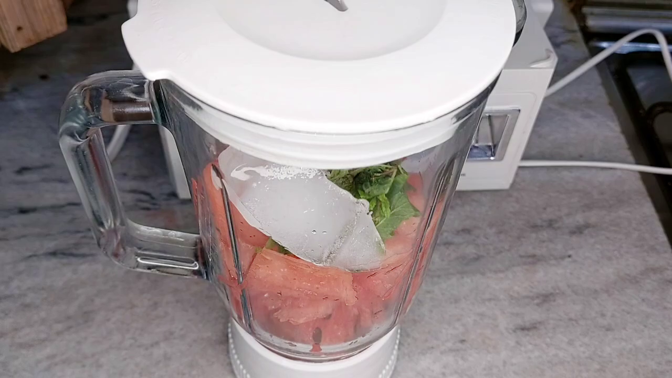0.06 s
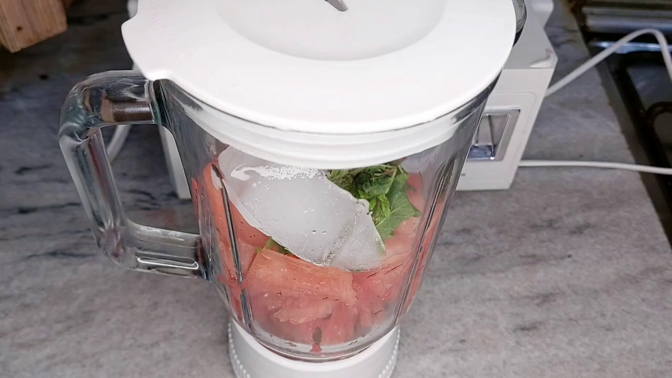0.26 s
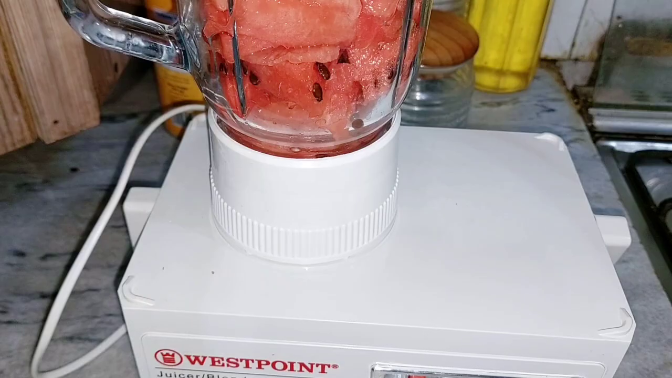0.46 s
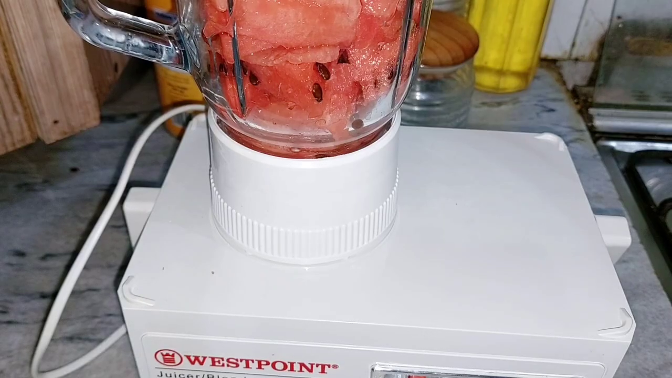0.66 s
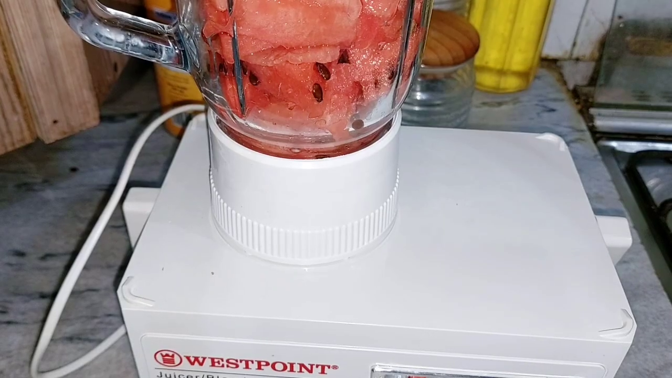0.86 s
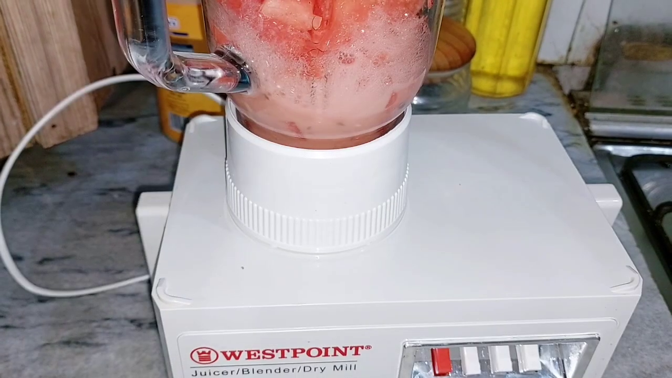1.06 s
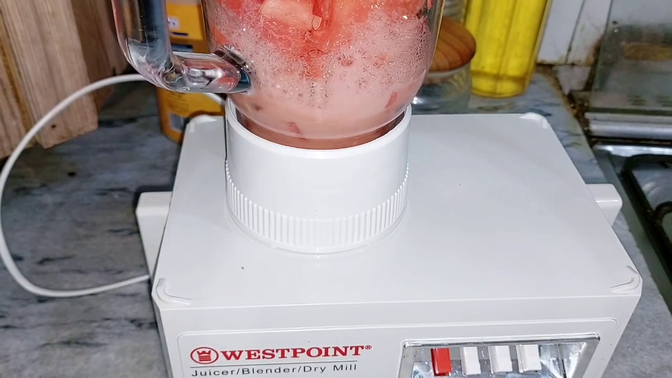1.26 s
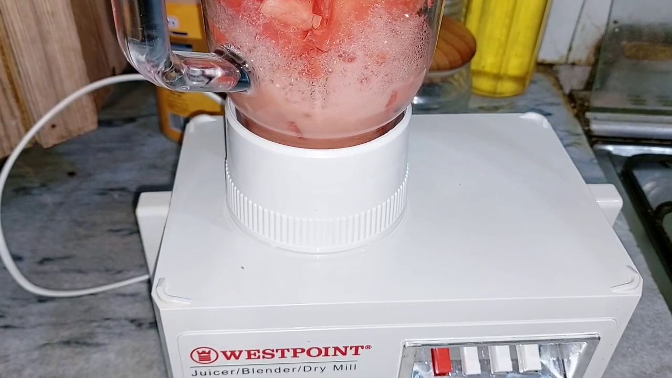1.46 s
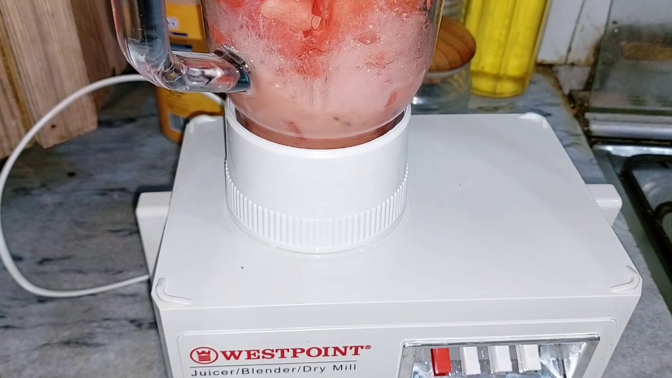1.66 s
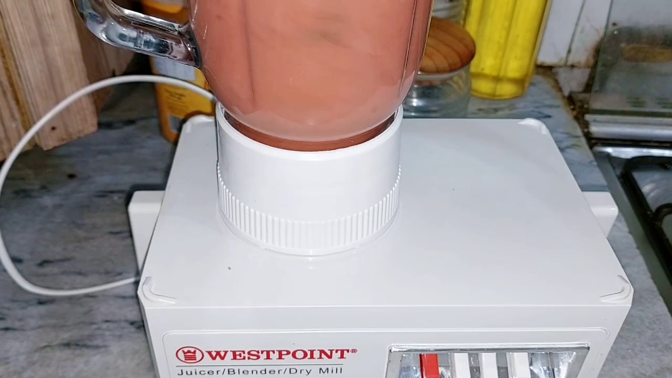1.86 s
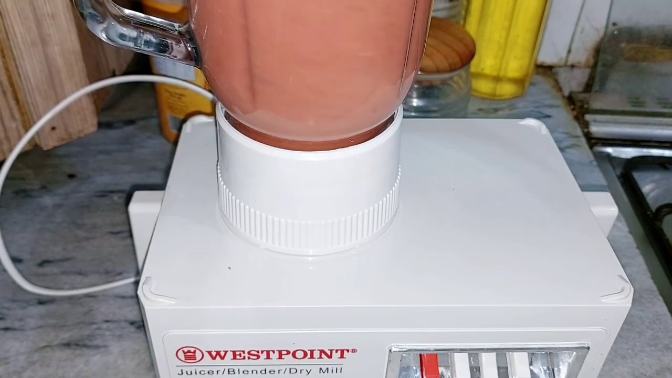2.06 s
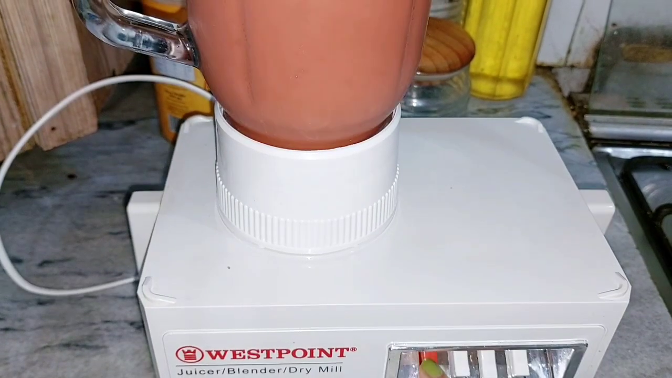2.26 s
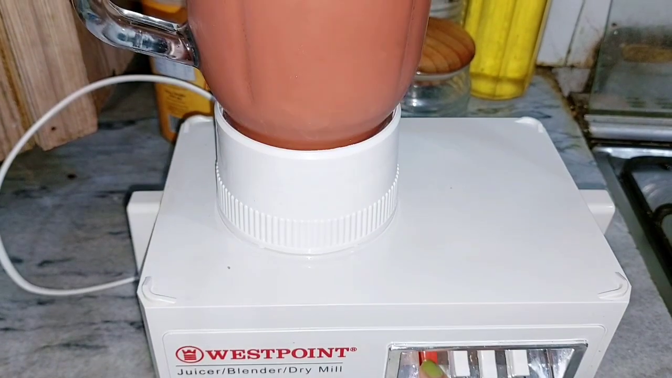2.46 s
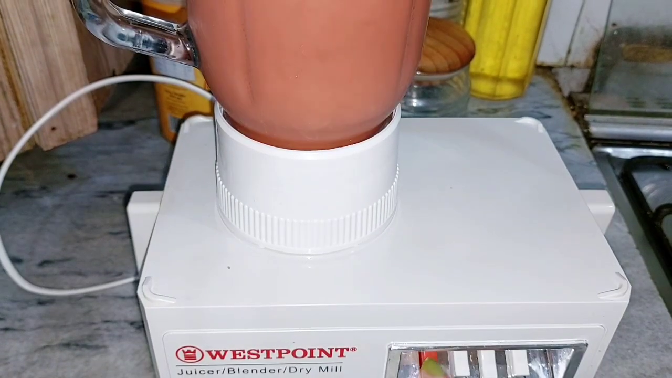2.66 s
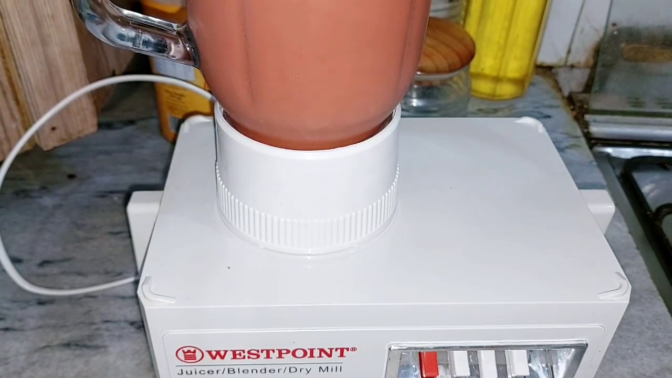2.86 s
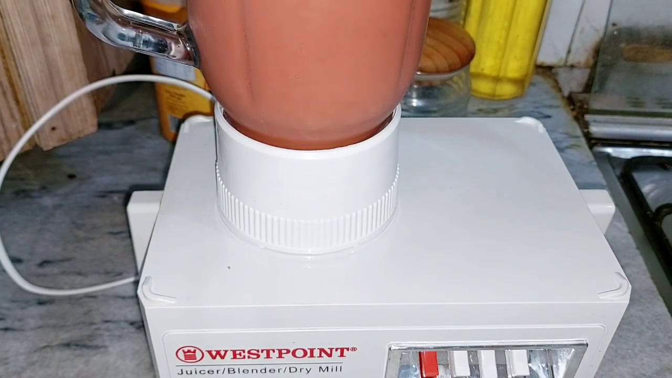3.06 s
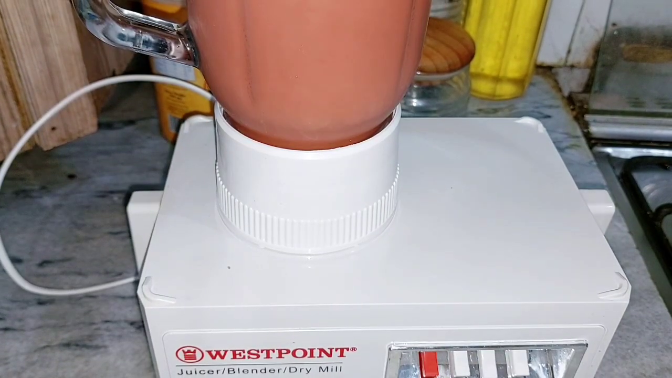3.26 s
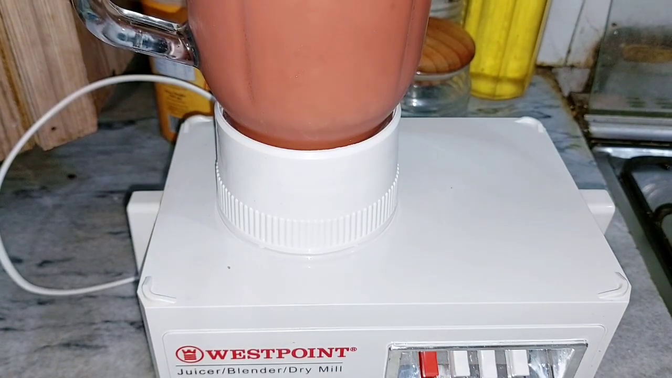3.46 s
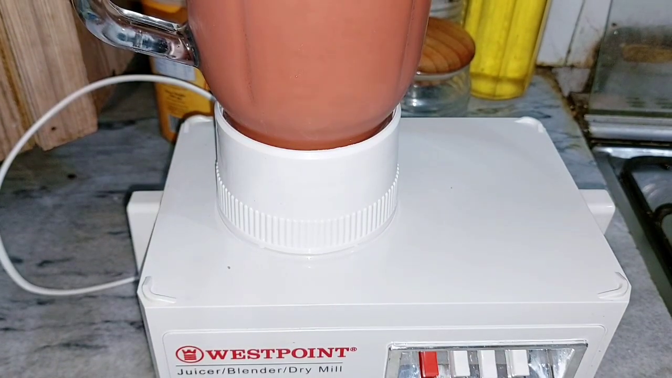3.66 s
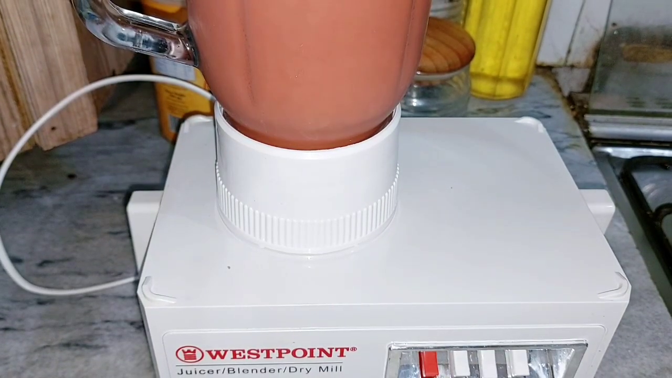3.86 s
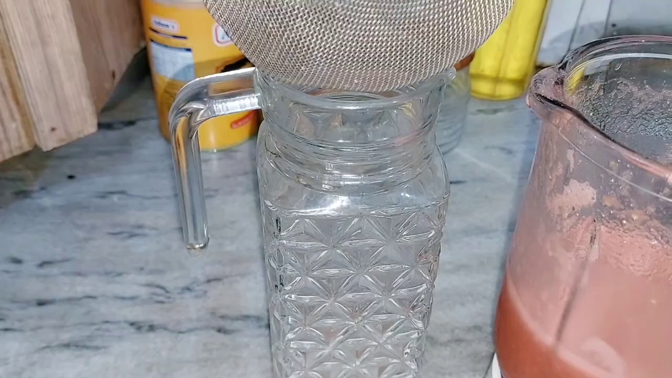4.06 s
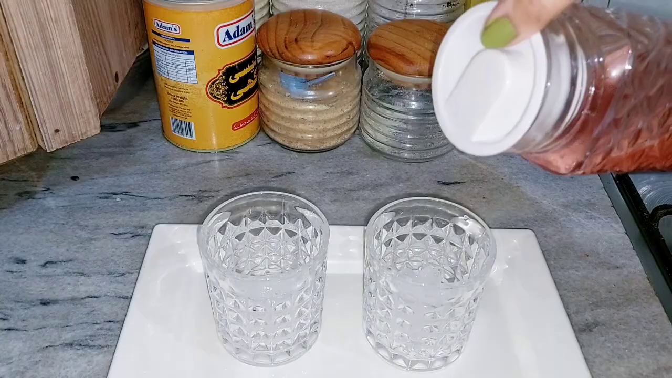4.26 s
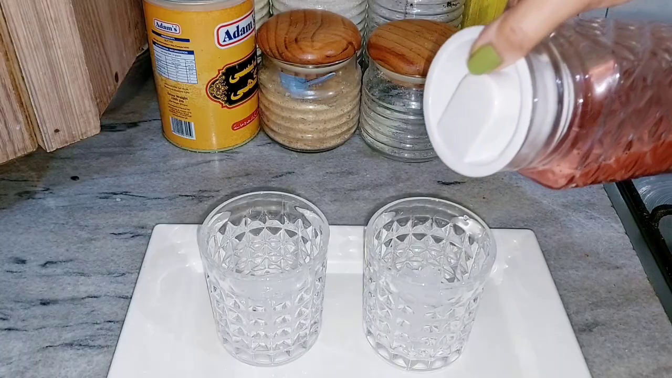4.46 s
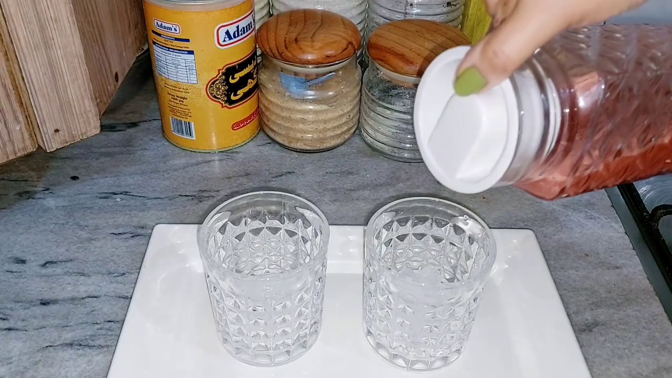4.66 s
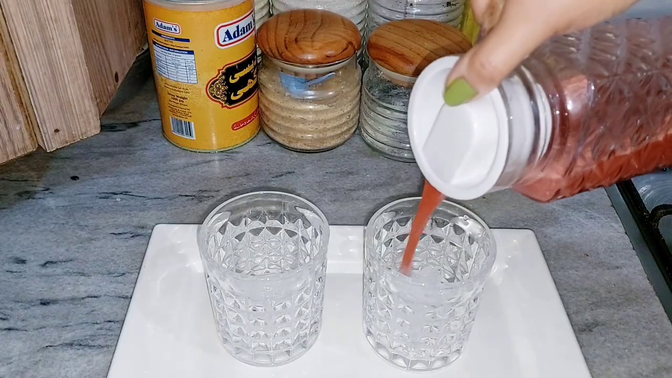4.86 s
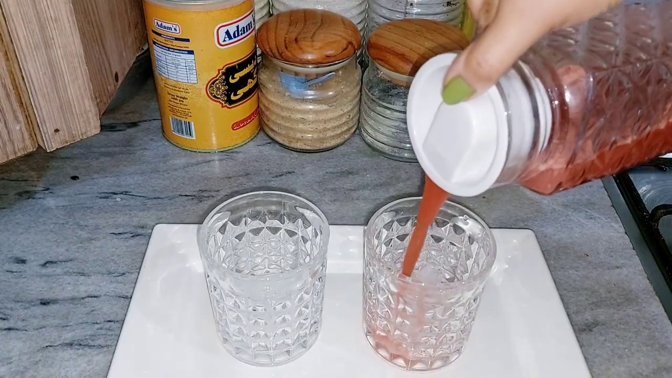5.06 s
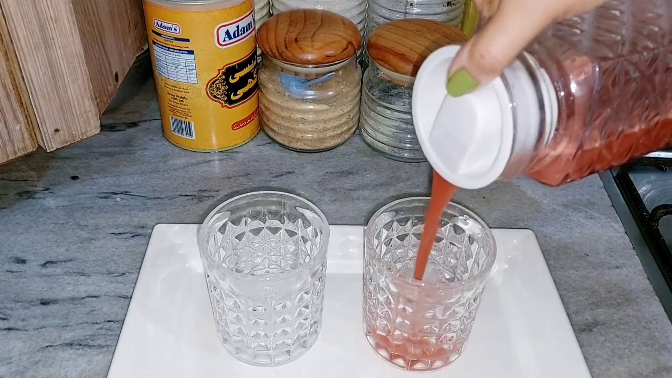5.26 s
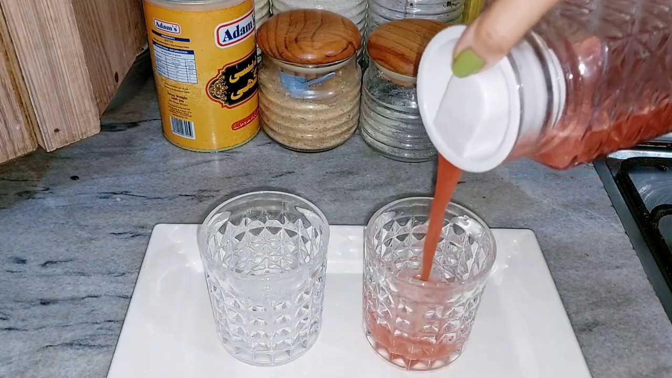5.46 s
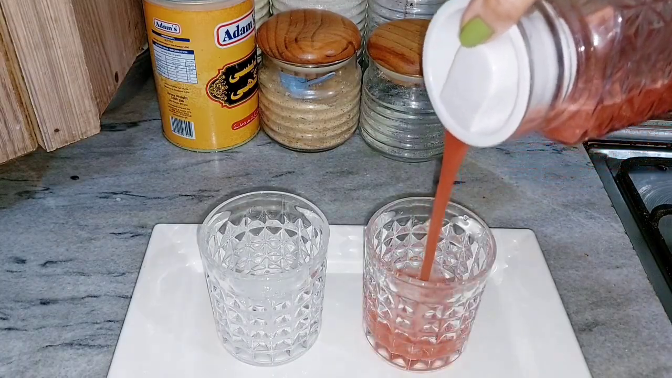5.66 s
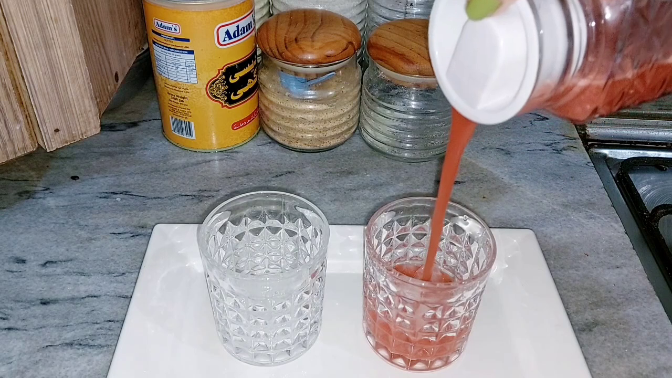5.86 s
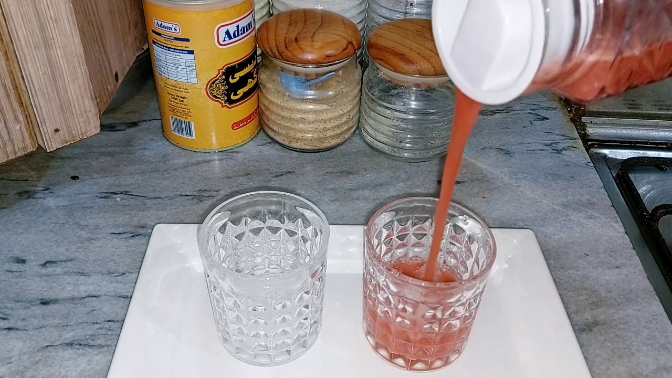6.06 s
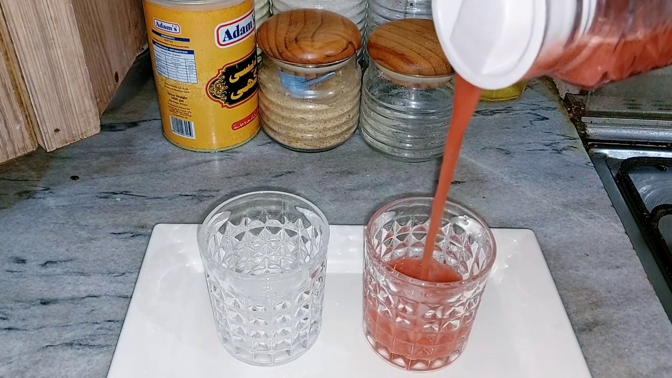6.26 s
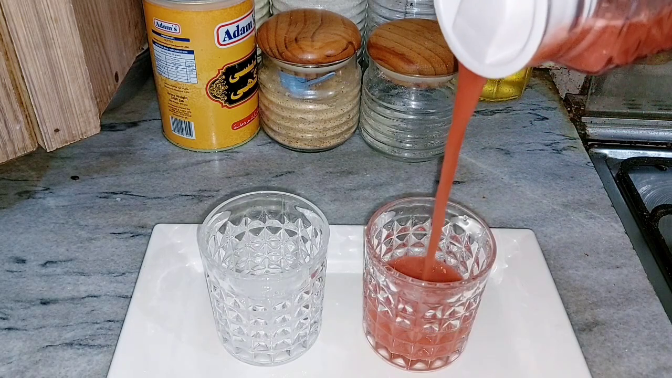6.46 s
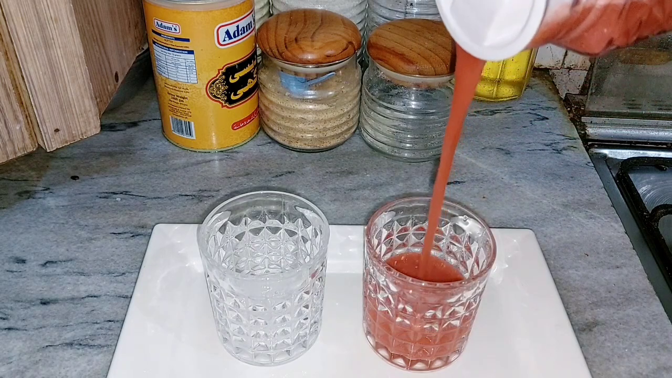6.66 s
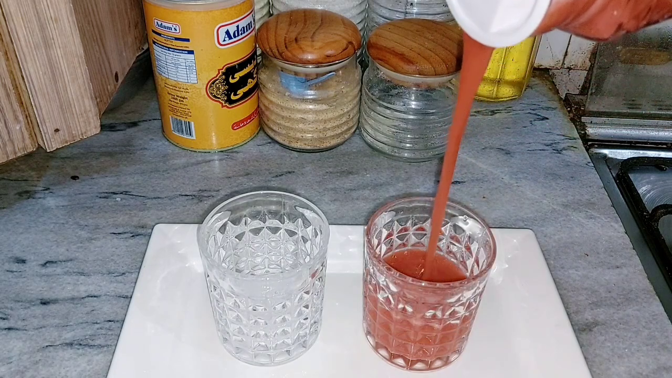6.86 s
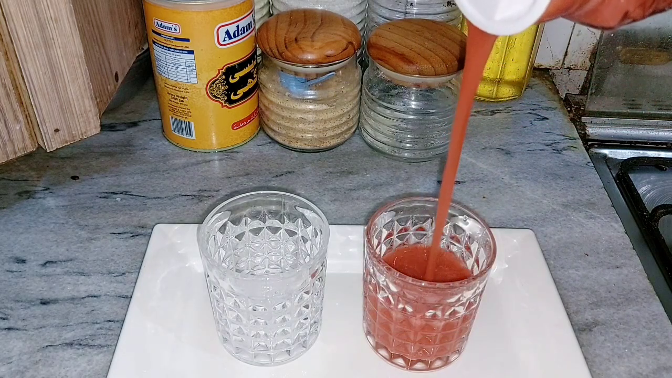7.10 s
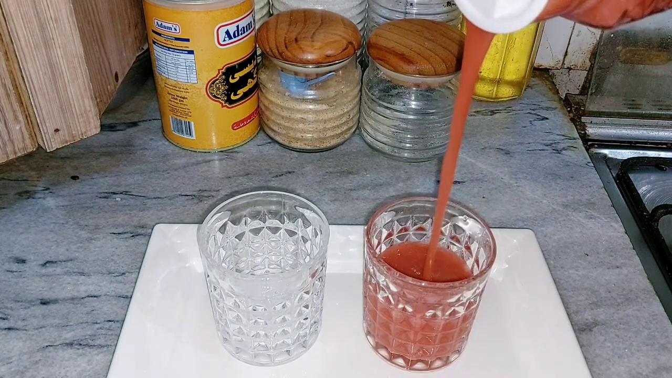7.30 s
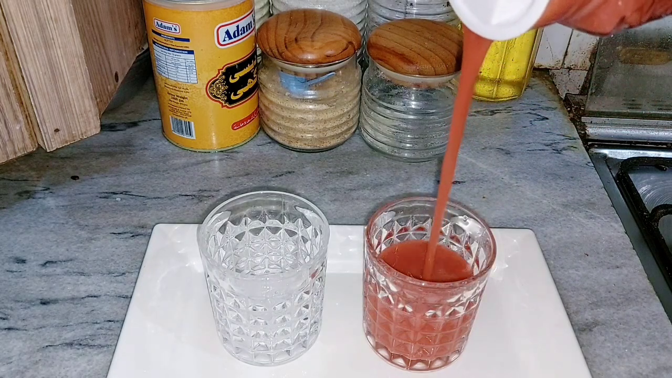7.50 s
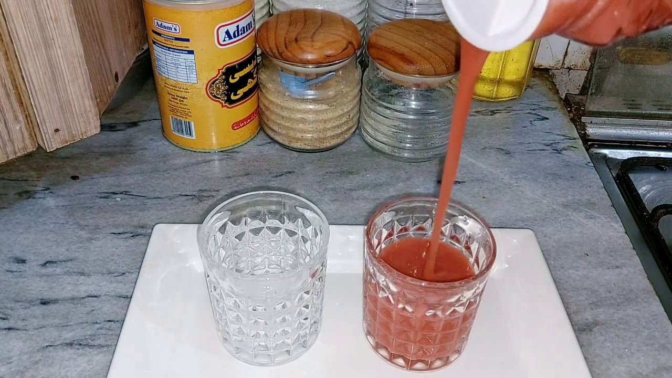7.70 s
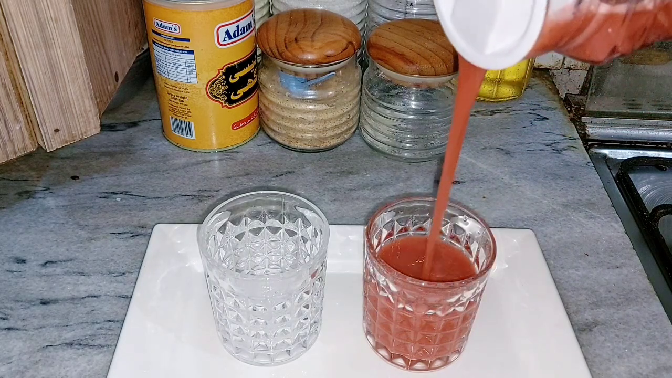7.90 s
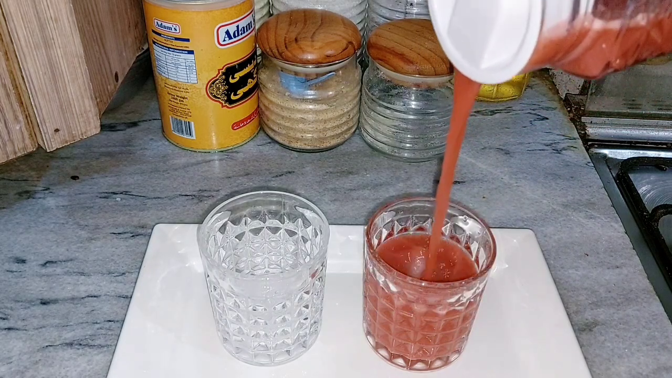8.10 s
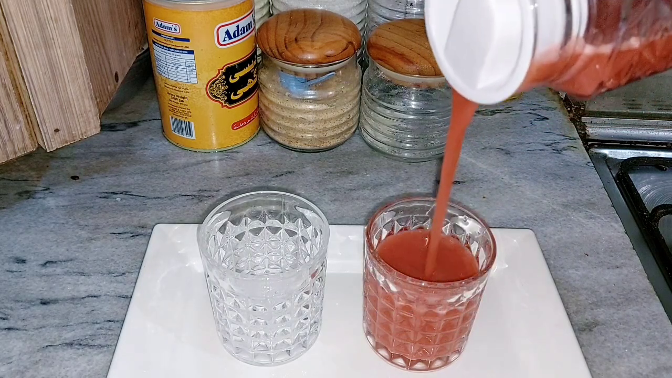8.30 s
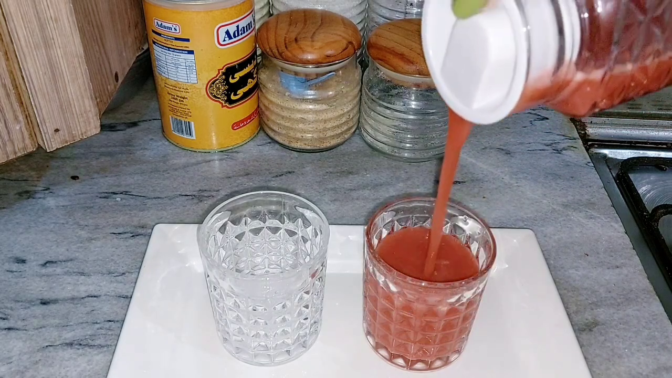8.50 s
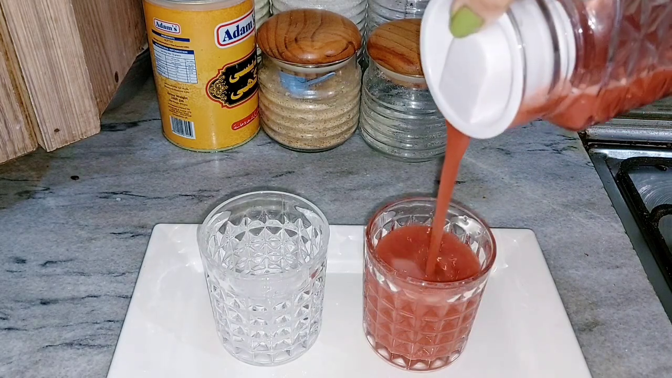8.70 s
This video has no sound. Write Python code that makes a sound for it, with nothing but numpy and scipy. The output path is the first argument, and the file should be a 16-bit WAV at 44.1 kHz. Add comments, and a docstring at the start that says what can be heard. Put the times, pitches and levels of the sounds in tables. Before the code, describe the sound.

A nearby countertop blender whines and churns through fruit, rises abruptly to grind ice against its glass jar, and settles into an even whir before cutting off. The kitchen's soft hum, rumble and gently pulsing hiss remain. Juice then meets an empty glass with a faint fizz, and little air pockets pop in irregular wet plops with a short room echo.

```python
"""A kitchen: low rumble, hum and a thin hiss swelling about three times a second run throughout.
At 0.9 s a glass-jar blender starts: motor tones, blades beating the pulp, cooling air, ringing glass.
It chops fruit, jumps to crushing ice at 1.8 s, jumps to whirling smooth juice at 2.3 s and stops dead
at 4.0 s. From 4.8 s the thick juice is poured into a tumbler: the stream fizzes briefly on the bare
glass and pockets of air pop in small, wet plops."""
import sys
import numpy as np
from scipy import signal
from scipy.fft import rfft, irfft, next_fast_len
from scipy.io import wavfile
from scipy.ndimage import uniform_filter1d

SR = 44100
rng = np.random.default_rng(int(sys.argv[2]) if len(sys.argv) > 2 else 0)


def wav_out(sig):
    """Save sig, one row per channel (or a flat mono array), as 16-bit PCM at SR to the path in sys.argv[1]."""
    wavfile.write(sys.argv[1], SR, np.round(np.clip(np.atleast_2d(sig).T, -1, 1) * 32767).astype(np.int16))


N = 385377
TIME_S = np.arange(N) / SR
CHOP_S, ICE_S, SMOOTH_S, STOP_S, POUR_S = .9447, 1.79, 2.295, 4.025, 4.224

# room noise spectra: (frequency [Hz], relative density [dB])
RUMBLE_SPECTRUM = [(25, -23), (70, -13), (100, 3), (145, 1), (195, -8.5), (300, -7), (410, -4.5),
                   (560, -10), (750, -17), (1020, -14), (1500, -22), (2200, -26), (2700, -28.5),
                   (3200, -29.5), (8000, -37), (16000, -40)]
HISS_SPECTRUM = [(2000, -13), (3200, -9), (3850, 1), (4500, -3.5), (5600, -12), (8600, -20), (11500, -8),
                 (13500, -11.5), (16000, -4.5)]
WHISTLE_SPECTRUM = [(10000, -17.5), (12500, -11.5), (14200, -1.5), (14600, -3), (15100, 4.5), (16000, -2.5)]
# room noise, left to right: (frequency [Hz], correlation [-1..1])
ROOM_LIKENESS = [(60, 0.77), (130, 0.97), (290, 0.87), (640, 0.32), (1410, -0.27), (3100, 0.045),
                 (6820, -0.086), (15000, -0.047)]
# mains hum: (frequency [Hz], base level [dB])
HUM_TONES = [(53.8, -49), (96.9, -67), (404, -51.5)]
# abrupt steps of the room: (start [s], one hiss crest [s], hiss [dB], rumble [dB], hum gain [dB])
ROOM_STEPS = [(0, 0.174, -48, -41, -8), (0.395, 0.647, -50, -42, 2), (0.933, 1.0, -51, -42, -13),
              (4.027, 4.12, -51.5, -40.5, -9), (4.23, 4.357, -51, -40.5, -1)]
# room drift under the pour: (time [s], rumble and hiss gain [dB], hum gain [dB])
ROOM_DRIFT = [(4.8, -3, -2), (5.35, -1.1, 3.5), (7.3, -0.5, 2), (7.8, 0.5, -4), (8.7, -1.5, -3)]

# shaft speed, rows chop / ice / smooth: (start [Hz], end [Hz])
STAGE_SPEEDS = [(196.2, 191.8), (239, 235.5), (245.6, 246.5)]
# base levels, same rows: (churning [dB], air [dB], air left minus right [dB], glass ring [dB])
STAGE_LEVELS = [(-25.5, -33.5, -4.5, -55), (-26.5, -37, -2, -29), (-25, -34.5, -3, -39.5)]
# shaft, blade and commutator tones: (multiple of speed, chop [dB], ice [dB], smooth [dB])
MOTOR_TONES = [(1, -38, -28, -28), (2, -45, -46, -39.5), (3, -38, -34.5, -26.5), (4, -35, -43, -56),
               (5, -27, -64, -61), (7, -35.5, -27, -67), (8, -31, -58, -67), (9, -32, -55, -44),
               (12, -39.5, -52, -55), (24, -58, -56, -41), (36, -65, -60, -54), (48, -40, -58, -41)]
# close sources, left to right: (frequency [Hz], correlation [-1..1])
NEAR_LIKENESS = [(60, 0.3), (290, 1), (640, 0.77), (1410, 0.33), (3100, 0.32), (5200, 0.37), (7000, .1),
                 (15000, .05)]
# blender position: (frequency [Hz], left minus right [dB])
BLENDER_BALANCE = [(60, -9), (120, 5), (240, -0.5), (480, -1), (950, 1.5), (1890, 1), (3770, -1), (7520, 1),
                   (15000, -3)]
# blender position: (frequency [Hz], left lead [rad])
BLENDER_PHASE = [(100, 0.19), (700, 0.55), (2000, 0.4), (5000, 2.2), (9000, 2.1), (15000, 5.7)]
# churning per stage, and cooling air: (frequency [Hz], relative density [dB])
CHOP_SPECTRUM = [(40, -36), (100, -16), (210, -11), (280, -1), (500, -13), (720, -7), (960, 4),
                 (1180, -3.5), (1650, -1), (2300, -7), (2900, -7), (3600, -13.5), (6500, -17.5),
                 (8500, -16), (15000, -21.5)]
ICE_SPECTRUM = [(40, -44), (100, -23), (200, -39), (270, 0), (520, -7), (800, -4.5), (1000, -0.5),
                (1650, -1.5), (2400, -6.5), (3500, -9), (5000, -12), (6500, -26), (8500, -21.5),
                (15000, -28)]
SMOOTH_SPECTRUM = [(40, -44), (110, -10), (195, -15.5), (270, 0), (390, -2), (580, -7), (800, -5),
                   (980, 0.5), (1170, -1.5), (1650, -0.5), (2300, -8.5), (2900, -11.5), (3600, -15),
                   (6500, -20), (8500, -20.5), (15000, -33)]
AIR_SPECTRUM = [(3000, -37), (5000, -4.5), (7500, -4.5), (8600, -24), (10000, -6), (11200, -10),
                (12200, -0.5), (13500, -1.5), (14200, -1.5), (16000, -12)]
# resonances of housing and filled jar: (frequency [Hz], width [Hz], lift [dB])
BODY_MODES = [(270, 15, 1.5), (380, 18, 4.5), (683, 28, 7), (960, 20, 7), (1300, 20, 1.5), (1580, 33, 9),
              (1660, 26, 7.5), (1790, 47, 2.5), (1930, 120, 6.5), (2350, 32, 4.5)]
# glass jar modes: (frequency [Hz], width [Hz], relative level [dB])
JAR_MODES = [(5170, 120, 10.5), (5200, 180, -8), (4680, 160, -8), (4270, 100, -19), (6230, 530, -11),
             (1530, 78, 3)]
# churning and glass ring briefly swell (+) or dip (-): (time [s], churning gain [dB], half-width [s])
LEVEL_SURGES = [(0.985, 1, .03), (1.05, -1.5, 0.021), (1.112, 2, .02), (1.566, 2.5, .02),
                (1.907, 2.5, 0.027), (2.02, -3, 0.016), (2.125, 3, 0.0089), (2.15, -4, 0.0099),
                (2.265, -2, .025), (2.402, 2, 0.045), (2.689, 1.5, .03), (2.77, -1.5, 0.035),
                (3.304, -0.5, .04), (3.472, 3, .065), (3.74, 2.5, 0.043)]
# ice caught by the blades: (time [s], peak grip [dB], half-width [s])
ICE_CATCHES = [(1.83, -24, 0.023), (1.978, -24, .008), (2.059, -22, 0.0182), (2.127, -21, 0.0081),
               (2.137, -40, 0.0073), (2.176, -24, 0.016), (2.187, -16.5, 0.015), (2.225, -24, 0.00856),
               (2.281, -26.5, 0.013), (2.425, -38, 0.0052), (2.59, -32, 0.0032)]
# ice being ground: (frequency [Hz], relative density [dB])
CRUNCH_SPECTRUM = [(150, -36), (450, -15.5), (690, 4), (820, 1), (1300, 8), (2000, 5), (2850, 1),
                   (3600, -0.5), (5200, -9), (6700, -7), (10000, -25.5), (16000, -38)]

# air pockets in the poured juice: (time [s], base level [dB], pitch [Hz], splash share [ratio])
JUICE_PLOPS = [(4.829, -41, 2420, 0.17), (6.7512, -32.5, 1480, 0.37), (6.7984, -31.5, 1500, .33),
               (6.888, -34, 2400, .5), (6.952, -31, 1500, 0.53), (7.078, -33, 2100, 0.4),
               (7.1171, -16.2, 1900, .24), (7.145, -34.5, 1630, 0.28), (7.6406, -34.5, 1530, 0.23),
               (7.7819, -31, 1600, 0.28), (7.849, -41.5, 1820, .2), (8.0493, -34, 1670, 0.3),
               (8.083, -30.5, 1520, 0.23), (8.13, -36, 1430, 0.22), (8.2225, -36.5, 1820, 0.25),
               (8.2618, -30.5, 2210, 0.45), (8.312, -27.5, 2100, .33), (8.543, -36, 1640, 0.55)]
# reflections off tumbler, tray and wall: (delay [s], left gain [ratio], right gain [ratio])
PLOP_ECHOES = [(.0011, 0.76, 1.47), (.0022, .1, 0.64), (.0032, 1, 0.19), (.0042, 0.093, 0.54),
               (.0058, .45, .1), (.0089, 0.75, 0.11), (0.029, 0.46, 0.15)]
# plop splash and stream fizz: (frequency [Hz], relative density [dB])
SPLASH_SPECTRUM = [(300, -20), (800, 2), (1350, 8), (2100, 2.5), (2700, -4), (3600, -7), (5000, -21),
                   (7500, -12), (12000, -32)]
FIZZ_SPECTRUM = [(4000, -25), (7000, -8), (10500, -3), (12500, 0), (15000, -8)]


def gain_of(db):
    """Decibels to amplitude."""
    return 10 ** (np.asarray(db) / 20)


def unit_rms(x):
    """Scales to unit rms; a stereo pair by its mid signal."""
    return x / np.sqrt(np.mean(np.atleast_2d(x).mean(0) ** 2) + 1e-20)


def at_hz(points, hz):
    """Interpolates on a log-frequency axis."""
    points_hz, values = np.transpose(points)
    return np.interp(np.log(hz + 1), np.log(points_hz + 1), values)


def curves(rows):
    """Interpolates (time [s], values...) at every sample."""
    times_s, *columns = np.transpose(rows)
    return [np.interp(TIME_S, times_s, column) for column in columns]


def bump(centre_s, half_width_s):
    """Gaussian rise and fall."""
    return np.exp(-((TIME_S - centre_s) / half_width_s) ** 2)


def pulse(age_s, rise_s):
    """Rises to one at rise_s, then decays."""
    return age_s / rise_s * np.exp(1 - age_s / rise_s)


def wander(rate_hz):
    """Slow random curve, unit rms."""
    width = max(int(SR / rate_hz / 2), 2)
    return unit_rms(uniform_filter1d(uniform_filter1d(rng.standard_normal(N), width), width))


def white():
    """Two independent white noises."""
    return rng.standard_normal((2, N))


def impacts(per_s, spread_db):
    """Two trains of tiny, uneven blows."""
    size = gain_of(spread_db * np.minimum(rng.exponential(1, N), 4))
    struck = rng.random(N) < per_s / SR
    return unit_rms(size * struck * white())


def filtered(x, response):
    """Applies response(hz)."""
    size = next_fast_len(N + 4096, True)
    return irfft(rfft(x, size) * response(np.fft.rfftfreq(size, 1 / SR)), size)[..., :N]


def coloured(x, spectrum):
    """Shapes x by a spectrum, to unit rms."""
    return unit_rms(filtered(x, lambda hz: gain_of(at_hz(spectrum, hz))))


def paired(x, likeness):
    """Blends two independent signals into partly correlated left and right."""
    def weights(hz):
        angle_rad = np.arccos(np.clip(at_hz(likeness, hz), -1, 1)) / 2
        return np.array([np.cos(angle_rad), np.sin(angle_rad)])
    mid, side = filtered(x, weights)
    return np.array([mid + side, mid - side])


def rippled(x, depth_db, width_hz):
    """Counter and wall reflections comb each channel with static peaks and dips."""
    grid_hz = np.arange(0, SR / 2, max(width_hz, 10))
    ripple = rng.standard_normal((2, SR // 20 + 1))[:, :len(grid_hz)]
    ripple_db = depth_db * ripple * np.clip(grid_hz / 2500, 0, 1)
    return unit_rms(filtered(x, lambda hz: gain_of([np.interp(hz, grid_hz, db) for db in ripple_db])))


def swell(since_crest_s, depth_db, rate_hz=3.34, skew=.19, flatten=.25):
    """Level cycle in dB: quick rise, broad crest, slower fall."""
    phase_rad = 2 * np.pi * rate_hz * since_crest_s
    return depth_db * (np.cos(phase_rad) - skew * np.sin(2 * phase_rad) - flatten * np.cos(2 * phase_rad))


def room_noise(spectrum):
    """Wide noise, combed by the walls."""
    return coloured(rippled(paired(white(), ROOM_LIKENESS), depth_db=5, width_hz=60), spectrum)


def room(whistle_lag_s=.054):
    """Rumble and hum under a swelling hiss; its fluttering, whistling top swells later."""
    step = np.searchsorted([row[0] for row in ROOM_STEPS[1:]], TIME_S)
    _, crest_s, hiss_db, rumble_db, hum_db = np.array(ROOM_STEPS)[step].T
    drift_db, hum_drift_db = np.array(curves(ROOM_DRIFT)) * (TIME_S > POUR_S)
    rumble = gain_of(rumble_db + drift_db + 1.34 * wander(2.5)) * room_noise(RUMBLE_SPECTRUM)
    hum = sum(gain_of(db) * (1 + .15 * wander(10)) * np.sin(2 * np.pi * hz * TIME_S + .6 * wander(2))
              for hz, db in HUM_TONES)
    hum *= gain_of(hum_db + hum_drift_db)
    swell_db = swell(TIME_S - crest_s, depth_db=3.5) + 1.5 * wander(22)
    hiss = gain_of(hiss_db + drift_db + swell_db) * room_noise(HISS_SPECTRUM)
    flutter_db = swell(TIME_S - crest_s - whistle_lag_s, depth_db=3) + 1.9 * wander(20)
    whistle = gain_of(hiss_db + drift_db + 3.5 + flutter_db) * room_noise(WHISTLE_SPECTRUM)
    return (rumble + hum) * gain_of([[-.5], [.5]]) + (hiss + whistle) * gain_of([[-2.3], [2.3]])


def blender(ring_per_surge=.81):
    """One shaft drives motor tones, blades and cooling air through three stages."""
    edges_s = [CHOP_S, ICE_S, SMOOTH_S, STOP_S]
    gates = np.array([np.clip(np.minimum(TIME_S - on_s, off_s - TIME_S) * 1000, 0, 1)  # 1 ms ramps
                      for on_s, off_s in zip(edges_s, edges_s[1:])])
    running = gates.sum(0)
    churn_db, air_db, pan_db, ring_db = np.transpose(STAGE_LEVELS) @ gates / np.maximum(running, 1e-9)
    surge_db = sum(db * bump(at_s, half_s) for at_s, db, half_s in LEVEL_SURGES)
    grip = sum(gain_of(db) * bump(at_s, half_s) for at_s, db, half_s in ICE_CATCHES)
    shaft_rad = shaft_angle(edges_s, gates, grip)
    beat = 1 + (np.array([.16, .12, .04]) @ gates) * np.cos(shaft_rad)  # harder once a turn
    return (running * cooling_air(beat, air_db, pan_db)
            + motor(shaft_rad, gates)
            + churning(beat, gates, churn_db + surge_db)
            + running * jar_ring(ring_db + ring_per_surge * surge_db)
            + ice_crunch(shaft_rad, grip))


def shaft_angle(edges_s, gates, grip, sag_hz_per_grip=99.05, recover_s=.039):
    """Rotation in radians: speed drifts, sags on caught ice and jitters as lumps tug."""
    free_hz, = curves([(edges_s[stage + end], hz)
                       for stage, pair in enumerate(STAGE_SPEEDS) for end, hz in enumerate(pair)])
    pole = np.exp(-1 / (recover_s * SR))
    sag_hz = sag_hz_per_grip * signal.lfilter([1 - pole], [1, -pole], grip)
    jitter = (np.array([.009, .014, .004]) @ gates) * wander(54.5)
    return 2 * np.pi * np.cumsum((free_hz - sag_hz) * (1 + jitter)) / SR


def placed(x):
    """The blender reaches the left slightly earlier; balance varies with frequency."""
    side = np.array([[.5], [-.5]])
    return filtered(x, lambda hz: gain_of(side * at_hz(BLENDER_BALANCE, hz))
                    * np.exp(1j * side * at_hz(BLENDER_PHASE, hz)))


def cooling_air(beat, level_db, pan_db, shift_s=3.47, shift_ramp_s=.03):
    """The motor's air rush pulses once a turn; it shifts to the right at shift_s."""
    rush = rippled(paired(white(), NEAR_LIKENESS) * beat, depth_db=5.5, width_hz=55)
    shift_db = np.outer([-2, 3.5], (1 + np.tanh((TIME_S - shift_s) / shift_ramp_s)) / 2)
    sides_db = shift_db + np.outer([.5, -.5], pan_db)
    return gain_of(level_db + sides_db + .6 * wander(12)) * coloured(rush, AIR_SPECTRUM)


def motor(shaft_rad, gates, hum_hz=100):
    """Wavering multiples of shaft speed over the winding hum."""
    tones = np.zeros(N)
    for multiple, *stage_db in MOTOR_TONES:
        amplitude = (gain_of(stage_db) @ gates) * (1 + .24 * wander(21))
        tones += amplitude * np.cos(round(multiple) * shaft_rad + 2 * np.pi * rng.random())
    hum = gain_of(-48) * gates.sum(0) * np.sin(2 * np.pi * hum_hz * TIME_S)
    return placed(tones) + hum


def body(x):
    """Housing and contents resonate, lifting a few bands."""
    return filtered(x, lambda hz: gain_of(sum(db / (1 + (2 * (hz - mode_hz) / width_hz) ** 2)
                                              for mode_hz, width_hz, db in BODY_MODES)))


def churning(beat, gates, level_db):
    """Pulp and bubbles hit the blades; the jar's contents set the colour."""
    hits = unit_rms(white()) + .59 * impacts(per_s=2500, spread_db=2.5)
    beaten = placed(paired(hits, NEAR_LIKENESS)) * beat
    churn = rippled(body(beaten), depth_db=3, width_hz=55)
    chop, ice, smooth = gates
    staged = (chop * gain_of(1.63) * coloured(churn, CHOP_SPECTRUM)
              + ice * gain_of(2.4) * coloured(churn, ICE_SPECTRUM)
              + smooth * gain_of(2.5) * coloured(churn, SMOOTH_SPECTRUM))
    return gain_of(level_db + .85 * wander(23)) * staged


def jar_ring(level_db):
    """Hard chips ring the glass in a few narrow modes."""
    chips = rippled(impacts(per_s=2300, spread_db=2.5), depth_db=4.5, width_hz=45)
    ring = filtered(chips, lambda hz: sum(gain_of(db) / (1 + 2j * (hz - mode_hz) / width_hz)
                                          for mode_hz, width_hz, db in JAR_MODES))
    return gain_of(level_db + 1.2 * wander(27)) * gain_of([[-5.5], [1.5]]) * unit_rms(ring)


def ice_crunch(shaft_rad, grip):
    """The blades strike a caught lump once a turn and grind it twice a turn."""
    blows = np.exp(4 * np.cos(shaft_rad))
    blows = coloured(blows - blows.mean(), CRUNCH_SPECTRUM)
    grinding = placed(paired(white(), NEAR_LIKENESS)) * np.exp(np.cos(2 * shaft_rad))
    return grip * (.93 * coloured(grinding, CRUNCH_SPECTRUM) + blows / 2)


def plops():
    """Air pockets pop in thick juice: a few strong cycles, a faint after-ring, echoes, a splash."""
    local_s = TIME_S[:SR // 10]
    pops, splash_envelope = np.zeros((2, N)), np.zeros(N)
    paths = [(.0032, 1, 1)] + list(PLOP_ECHOES)
    for at_s, db, hz, share in JUICE_PLOPS:
        start = round(at_s * SR)
        span = slice(start, start + len(local_s))
        splash_envelope[span] += share * gain_of(db) * (pulse(local_s, .0022) + .28 * pulse(local_s, .02))
        for delay_s, left, right in paths:
            age_s = np.maximum(local_s - delay_s * (1 + .029 * rng.standard_normal()), 0)
            envelope = gain_of(db - 3) * (pulse(age_s, .00048) + .049 * pulse(age_s, .0022))
            pops[:, span] += np.outer([left, right], envelope * np.sin(2 * np.pi * hz * age_s))
    splash = coloured(paired(white(), NEAR_LIKENESS), SPLASH_SPECTRUM)
    return pops + gain_of(-4.5) * splash_envelope * splash


def kitchen_tail(x, t60_s, taps_per_s=3000):
    """Short diffuse tail of sparse reflections."""
    delay_s = TIME_S[:SR // 2]
    shape = (2, len(delay_s))
    taps = rng.standard_normal(shape) * (rng.random(shape) < taps_per_s / SR)
    taps *= gain_of(-60 * delay_s / t60_s) * (delay_s > .006)
    return signal.fftconvolve(x, taps / np.linalg.norm(taps[0]), axes=1)[:, :N]


def fizz():
    """The stream fizzes on the bare glass."""
    ticks = coloured(impacts(per_s=340, spread_db=-2), FIZZ_SPECTRUM)
    return gain_of(-54) * bump(centre_s=5.3, half_width_s=.2) * ticks


def scene():
    """Blender, then pour, over the room."""
    blending = blender()
    drops = plops()
    pour = drops + fizz() + gain_of(-8) * kitchen_tail(drops, t60_s=.33)
    return blending + pour + room()


def record(dry):
    """Soft clip, then low-pass."""
    drive, cutoff_hz = 1.1, 15900
    rounded = np.tanh(dry * drive) / drive
    lowpass = signal.firwin(511, cutoff_hz, window=("kaiser", 9), fs=SR)
    return signal.oaconvolve(rounded, lowpass[None], "same", axes=1)


dry = scene()
out = record(dry)
wav_out(out)
```